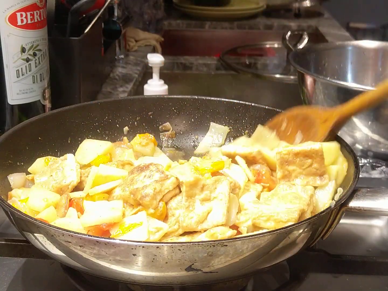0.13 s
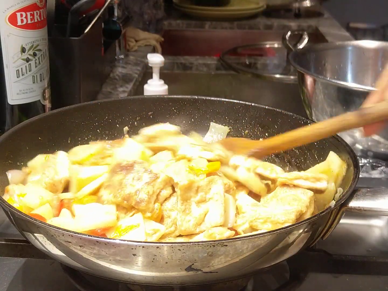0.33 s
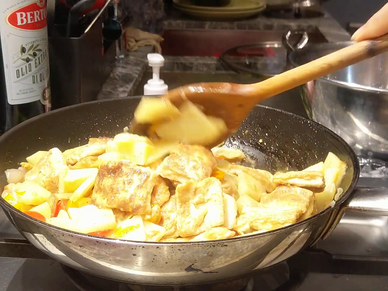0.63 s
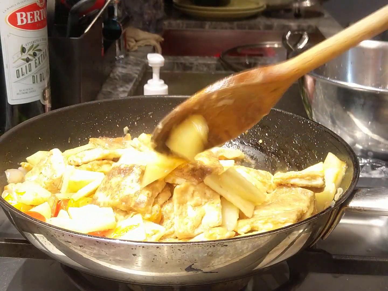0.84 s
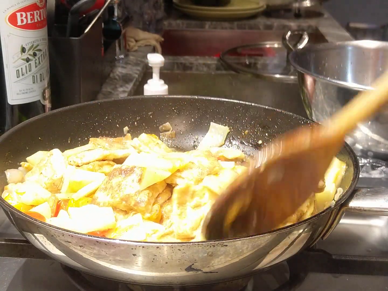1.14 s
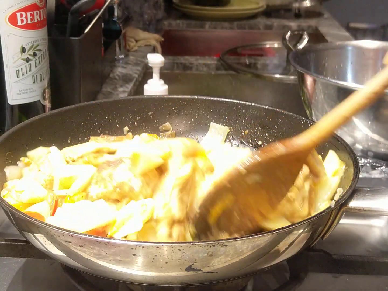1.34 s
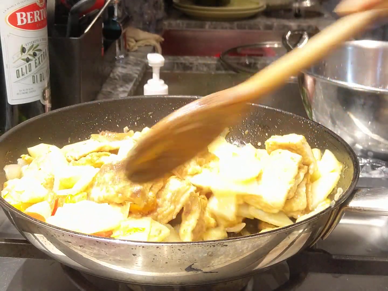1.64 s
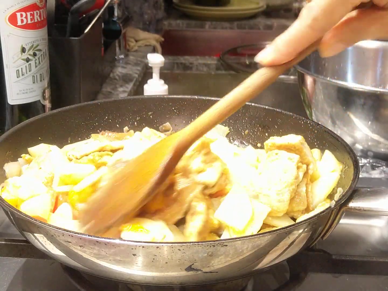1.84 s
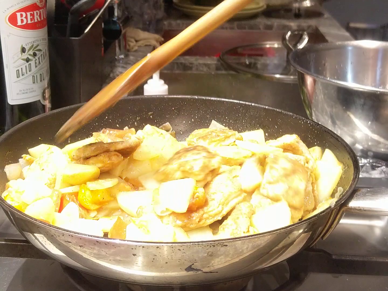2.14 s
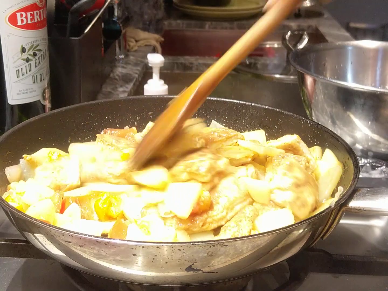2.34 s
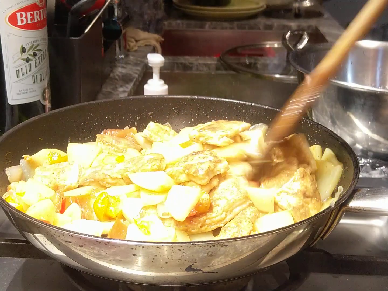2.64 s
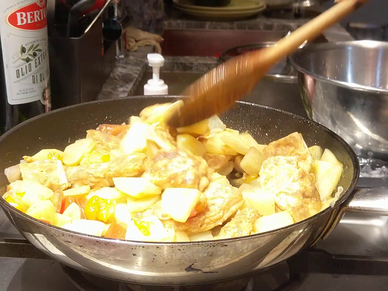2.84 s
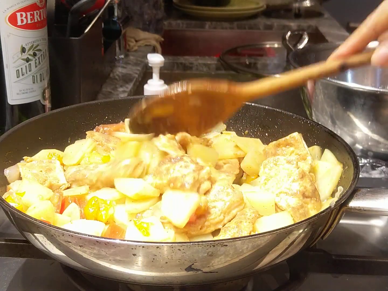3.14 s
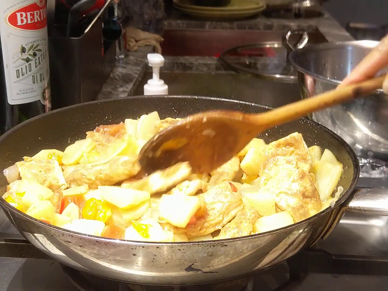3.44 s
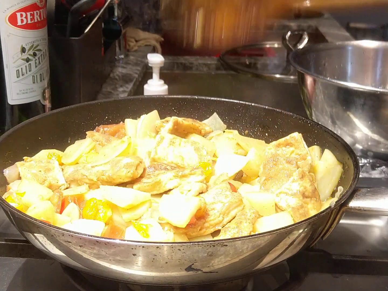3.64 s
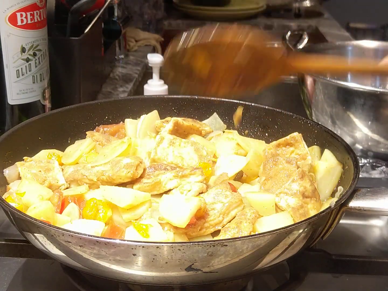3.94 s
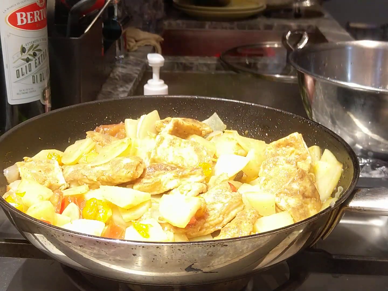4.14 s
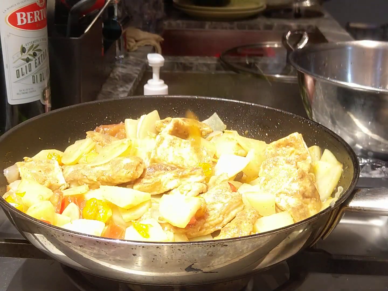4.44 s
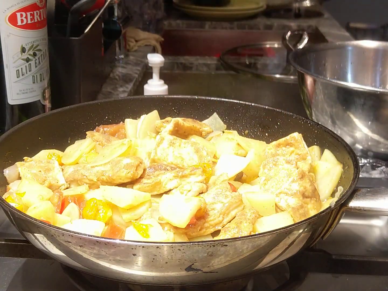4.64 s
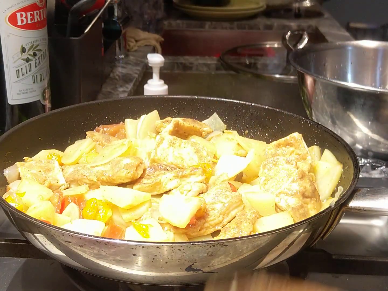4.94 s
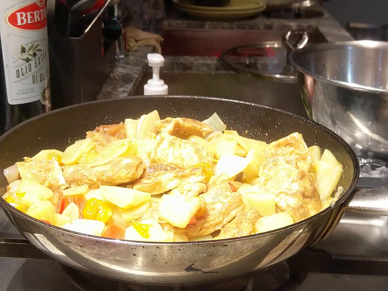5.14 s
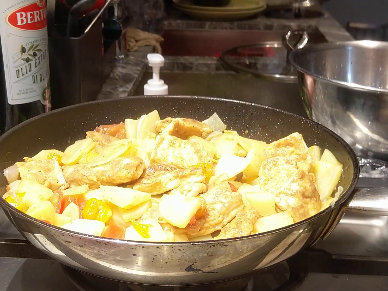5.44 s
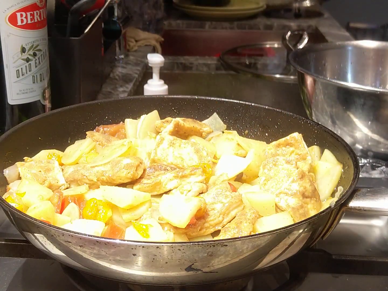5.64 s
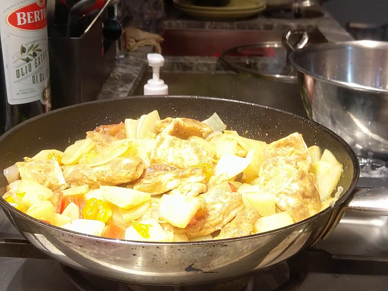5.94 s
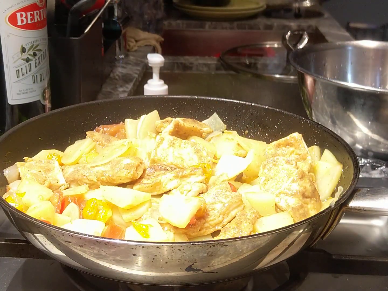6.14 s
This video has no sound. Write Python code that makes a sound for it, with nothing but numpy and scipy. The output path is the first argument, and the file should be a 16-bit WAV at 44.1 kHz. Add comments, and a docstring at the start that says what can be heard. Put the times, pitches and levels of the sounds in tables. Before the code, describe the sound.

Quiet squelches and plops over a gentle fizzing simmer, a loud wooden clack with a bell-like metallic ring, finally two small dry clicks.

```python
"""In a small kitchen, a wooden spoon gently turns meat and vegetables in a simmering steel pan.
Damped low modes give soft bumps, short notes with splashes the sauce plops, high bubble-like tones the smacks.
The spoon is swung aside and laid down: shaped noise and squeaks make it slide, its head knocks on
ringing steel (beating pairs of modes), its handle drops and bounces. Two sharp little clicks follow."""
import sys
import numpy as np
from scipy import signal
from scipy.fft import rfft, irfft
from scipy.io import wavfile
from scipy.ndimage import uniform_filter1d

SR = 44100
rng = np.random.default_rng(int(sys.argv[2]) if len(sys.argv) > 2 else 0)


def inscribe(sig):
    """Save sig as 16-bit PCM at rate SR to the path in sys.argv[1].

    A 1-D sig is mono; a 2-D sig holds one channel per row.
    Samples are clipped to [-1, 1] before scaling.
    """
    pcm = np.round(np.clip(np.atleast_2d(sig).T, -1, 1) * 32767)
    wavfile.write(sys.argv[1], SR, pcm.astype(np.int16))


N = 277389
TIME = np.arange(N) / SR
RING_TIME = TIME[:SR // 2]


def gain_of(db):
    """Level definition: 20 dB is a tenfold amplitude."""
    return 10 ** (np.asarray(db) / 20)


def evened(x):
    """Normalization to an rms amplitude of 1."""
    return x / np.sqrt(np.mean(x ** 2) + 1e-20)


def read(points, hz):
    """Linear interpolation of a table on a logarithmic frequency axis."""
    f, value = np.transpose(points)
    return np.interp(np.log(hz + 1), np.log(f + 1), value)


def add(mix, s, sound):
    """Superposition: mixes a sound in at s seconds."""
    part = mix[max(round(s * SR), 0):][:len(sound)]
    part += sound[:len(part)]


def cut(x, hz, kind, order):
    """Butterworth filtering, low-pass or high-pass."""
    return signal.sosfilt(signal.butter(order, hz, kind, fs=SR, output="sos"), x)


def noise(colour):
    """Spectral shaping: random noise of rms 1 with the given spectrum."""
    spectrum = rfft(rng.standard_normal(N))
    shape = gain_of(read(colour, np.fft.rfftfreq(N, 1 / SR)))
    return evened(irfft(spectrum * shape, N))


def mode(hz, t60):
    """Damped free vibration of one mode, decaying by 60 dB in t60 seconds."""
    return np.sin(2 * np.pi * hz * RING_TIME) * np.exp(-np.log(1000) * RING_TIME / t60)


def runs(events, gap_s, fade_db_per_s, spread, uneven_db=2.5, count=10):
    """Random repetition: each row repeats unevenly, weaker and scattered in pitch, over its length."""
    chances = rng.standard_normal((len(events), count, 3))
    for (s, length, db, hz), chance in zip(events, chances):
        yield s, db, hz
        for k, (late, detune, force) in enumerate(chance, 1):
            if k * gap_s < length:
                level = db - fade_db_per_s * k * gap_s + uneven_db * force
                yield s + gap_s * (k + late / 10), level, hz * np.exp(spread * detune)


# reverberation of the kitchen: (f/Hz, t60/s)
ROOM_DECAY = [(100, 0.4), (300, .45), (1000, 0.32), (3000, 0.31), (7000, 0.29), (12000, 0.25)]


def kitchen(x, wet_db):
    """Reverberation: dense reflections of random sign follow after 4 ms, each band with its own decay."""
    taps = rng.choice([-1., 1.], SR) * (rng.random(SR) < 1 / 8)
    hz, t, bands = signal.stft(taps, SR, nperseg=256)
    fading = np.exp(-np.log(1000) * t / read(ROOM_DECAY, hz)[:, None])
    tail = signal.istft(bands * fading, SR, nperseg=256)[1]
    tail[:round(.004 * SR)] = 0
    return x + gain_of(wet_db) * signal.fftconvolve(x, tail / np.linalg.norm(tail))[:N]


# spectral density of the kitchen air: (f/Hz, relative level/dB per Hz)
AIR_COLOUR = [(15, -38), (25, -15.5), (102, 0), (150, -5.5), (205, 3), (446, -13.5), (609, -10.5),
              (750, -19.5), (998, -15), (1200, -15.5), (1590, -16), (1810, -19), (3850, -20), (5390, -24),
              (12400, -30.5), (16100, -49.5), (22000, -120)]
# low drone in the kitchen: (f/Hz, bandwidth/Hz, level/dB)
DRONE_TONES = [(55.3, 29, -79), (100, 8, -83.5), (115.57, 6, -77.5), (193.8, 6.7, -78), (243.8, 11, -79.5),
               (587.6, 50, -86)]


def background(air_db=-70):
    """Narrow-band noise: a few low, wavering tones over steady broadband air."""
    hz = np.fft.rfftfreq(N, 1 / SR)
    drone = np.zeros(N)
    for f, width, db in DRONE_TONES:
        spectrum = rfft(rng.standard_normal(N)) / (1 + (2 * (hz - f) / width) ** 2)
        drone += gain_of(db) * evened(irfft(spectrum, N))
    return gain_of(air_db) * noise(AIR_COLOUR) + drone


def bursts(per_s):
    """Random impulse excitation: bubbles burst at random instants with random strength."""
    instants = rng.random(N) < per_s / SR
    return instants * gain_of(4 * np.minimum(rng.exponential(1, N), 3))


STIR_FROM_S, STIR_TO_S = .5, 2.9  # the spoon is in the food
# resonances of the filled pan: (f/Hz, relative level/dB)
PAN_MODES = [(610, 1), (877, -2.5), (1000, -1), (1595, -4), (1970, -8.5), (2880, -6.5), (3860, -6),
             (4600, -12)]


def simmer(fizz_db=-91.5, fizz_per_s=2.5, pan_db=-79, stir_db=4, count=30):
    """Resonance under random impulses: bubbles fizz and murmur in the pan; stirring lifts the fizz."""
    fizz, pan = np.zeros((2, N))
    for hz in np.geomspace(2500, 10500, count):  # fizz_per_s holds for each pitch
        fizz += signal.oaconvolve(bursts(fizz_per_s), mode(hz, 110 / hz)[:2048])[:N]
    for hz, db in PAN_MODES:
        pan += gain_of(db) * signal.oaconvolve(bursts(45), mode(hz, .03))[:N]
    stirring = uniform_filter1d(1. * (TIME > STIR_FROM_S) * (TIME < STIR_TO_S), size=SR // 3)
    bubbles = gain_of(fizz_db + stir_db * stirring) * evened(fizz) + gain_of(pan_db) * evened(pan)
    return kitchen(bubbles, wet_db=-4)


BUMP_HZ = 189
# soft bumps of food and spoon on the pan: (t/s, level/dB, time to peak/s)
BUMP_EVENTS = [(0.654, -57.5, .012), (0.733, -56, .012), (1.059, -50, .011), (2.057, -55, .008),
               (2.665, -48, .013), (2.99, -47, .024), (3.112, -51.5, .008), (4.47, -57, .013),
               (5.69, -50.5, .008)]


def bumps():
    """Soft impact: pushes swell and fade in the lowest mode of the pan on its grate."""
    out = np.zeros(N)
    detunes = rng.normal(0, .025, len(BUMP_EVENTS))
    for (s, db, swell), detune in zip(BUMP_EVENTS, detunes):
        u = RING_TIME / swell
        push = (u * np.exp(1 - u)) ** 1.5
        add(out, s, gain_of(db) * push * np.sin(2 * np.pi * BUMP_HZ * (1 + detune) * RING_TIME))
    return kitchen(out, wet_db=-15.5)


PLOP_GAP_S, PLOP_FADE_DB_PER_S, PLOP_SPREAD = .052, 18, .035
# the spoon presses the sauce into runs of plops: (t/s, run length/s, relative level/dB, f/Hz)
PLOP_RUNS = [(0.103, .02, -54, 983), (0.234, .02, -57, 635), (0.494, .02, -50, 997),
             (0.875, .06, -56, 1060), (1.416, .02, -52.5, 1575), (1.439, .02, -52, 1015),
             (1.714, .02, -56, 1024), (2.156, .06, -51, 875), (2.894, .32, -55, 884),
             (3.813, .02, -58, 864), (3.953, .02, -58.5, 1015), (4.154, .06, -52.5, 990)]


def plops(db=-4.5, note_t60=.13, rise_s=.005, splash_db=-9, splash_s=.0051):
    """Damped resonance: pockets of sauce open with a tiny splash and a short, soft note."""
    out = np.zeros(N)
    for s, level, hz in runs(PLOP_RUNS, PLOP_GAP_S, PLOP_FADE_DB_PER_S, PLOP_SPREAD):
        splash = cut(rng.standard_normal(len(RING_TIME)), hz * 1.73, "low", order=3)
        splash = evened(cut(splash, hz / 2, "high", order=2)) * np.exp(-RING_TIME / splash_s)
        note = mode(hz, note_t60) * (1 - np.exp(-RING_TIME / rise_s))
        add(out, s, gain_of(level + db) * (note + gain_of(splash_db) * splash))
    return kitchen(out, wet_db=-3.5)


STRAY_DB, STRAY_HZ = -62, 8400  # relative level, as in the runs of smacks


def strays(count=12):
    """Stratified random timing: faint smacks (t/s, relative level/dB, f/Hz) scattered over the stirring."""
    places = (np.arange(count) + rng.random(count)) / count
    times = STIR_FROM_S + (STIR_TO_S - STIR_FROM_S) * places
    pitches = STRAY_HZ * np.exp(SMACK_SPREAD * rng.standard_normal(count))
    return [(s, STRAY_DB, hz) for s, hz in zip(times, pitches)]


SMACK_GAP_S, SMACK_FADE_DB_PER_S, SMACK_SPREAD = .042, 30, .06
# wet pieces peel apart in runs of smacks: (t/s, run length/s, relative level/dB, f/Hz)
SMACK_RUNS = [(0.6636, .02, -47, 8640), (0.7057, .02, -45, 8420), (0.836, .02, -52.5, 8660),
              (1.0322, .1, -57.5, 8850), (1.4146, .06, -58.5, 9700), (1.6237, .02, -55.5, 7730),
              (2.14, .02, -55, 8780), (2.2197, .06, -53, 8810), (2.5142, .02, -52, 7660),
              (2.5473, .06, -52, 9000), (2.8403, .02, -55, 7520), (2.9312, .02, -56, 6150),
              (4.4535, .02, -52.5, 7973), (6.1977, .02, -58, 8050)]


def smacks(snap_db=-4, snap_t60=.021, bubble_db=-13, bubble_t60=.026, wait_s=.011, count=10):
    """Film rupture and bubble resonance: sauce snaps, and tiny bubbles of similar pitch ring after it."""
    out = np.zeros(N)
    onset = 1 - np.exp(-RING_TIME / .0007)
    events = [*runs(SMACK_RUNS, SMACK_GAP_S, SMACK_FADE_DB_PER_S, SMACK_SPREAD), *strays()]
    for s, level, hz in events:
        add(out, s + .00091, gain_of(level + snap_db) * mode(hz, snap_t60) * onset)
        waits = rng.exponential(wait_s, count)
        detunes = rng.normal(-.038, .23, count)
        sizes = rng.random(count)
        for wait, detune, size in zip(waits, detunes, sizes):
            bubble = mode(hz * np.exp(detune), bubble_t60) * onset
            add(out, s + wait, gain_of(level + bubble_db) * size * bubble)
    return kitchen(out, wet_db=0)


PING_GAP_S, PING_FADE_DB_PER_S, PING_SPREAD = .035, 25, .02
# light touches and grazes of the pan: (t/s, run length/s, relative level/dB, f/Hz)
PING_RUNS = [(0.672, .04, -62, 4700), (1.404, .02, -60, 4640), (2.1871, .08, -59.5, 5200),
             (3.755, .02, -62, 3800), (4.3355, .12, -59, 3860), (4.563, .02, -58, 2834),
             (5.084, .02, -57.5, 3907), (5.7259, .02, -62.5, 2850)]


def pings(db=-4, rise_s=.0027, pan_db=-3):
    """Frequency-dependent damping: a high pan mode dies sooner the higher it is, over other resonances."""
    out = np.zeros(N)
    pan = sum(gain_of(pan_db + mode_db) * mode(hz, .06) for hz, mode_db in PAN_MODES if hz > 1500)
    onset = 1 - np.exp(-RING_TIME / rise_s)
    for s, level, hz in runs(PING_RUNS, PING_GAP_S, PING_FADE_DB_PER_S, PING_SPREAD):
        ping = mode(hz, .11 * (3500 / hz) ** 2)
        add(out, s, gain_of(level + db) * (ping + pan) * onset)
    return kitchen(out, wet_db=-1.5)


# sharp clicks: (t/s, relative level/dB, lowest f/Hz)
CLICK_EVENTS = [(5.8828, -25, 8400), (5.9568, -27.5, 2558)]
# spectrum of a click: (f/Hz, relative level/dB)
CLICK_SPECTRUM = [(2000, -2.5), (2950, 5.5), (3900, -4), (5000, -7), (6500, -11), (9000, -15),
                  (10400, -27.5), (11500, -17), (13000, -31)]


def clicks(db=9, chatter_db=-20, chatter_s=.00281, ring_hz=2930, ring_db=-42, ring_t60=.14):
    """Minimum-phase impulse: hard snaps with brief chatter and a faint ring, largely through the room."""
    log_gain = np.log(gain_of(read(CLICK_SPECTRUM, abs(np.fft.fftfreq(1024, 1 / SR)))))
    snap = np.fft.ifft(np.exp(np.conj(signal.hilbert(log_gain)))).real
    snap /= abs(snap).max()
    ring = gain_of(ring_db) * mode(ring_hz, ring_t60)
    out = np.zeros(N)
    for s, level, low_hz in CLICK_EVENTS:
        chatter = rng.standard_normal(len(RING_TIME)) * np.exp(-RING_TIME / chatter_s)
        contact = gain_of(chatter_db) * chatter
        contact[0] = 1
        click = signal.fftconvolve(contact, snap)[:len(contact)] + ring
        add(out, s, gain_of(level + db) * cut(click, low_hz, "high", order=9))
    return kitchen(out, wet_db=-1.5)


# the spoon slides through the hand: the swish swells, then dies away
SLIDE_FROM_S, SLIDE_ATTACK_S, SLIDE_DB, SLIDE_FADE_DB_PER_S = 4.565, .1, -49.5, 120
# spectrum of skin sliding on wood: (f/Hz, relative level/dB)
SLIDE_SPECTRUM = [(1500, -33.5), (4500, -20), (5500, -9), (7500, -3), (9000, -8), (10500, -18),
                  (12500, -25)]


def slide(squeak_share=.9, count=24):
    """Friction: skin slips on wood; tiny squeaks come first, then a soft swish swells over them."""
    squeaks = np.zeros(N)
    for hz in np.geomspace(3300, 11500, count):
        slips = rng.standard_normal(N) * (rng.random(N) < 14 / SR)
        squeak = signal.oaconvolve(slips, mode(hz, .035)[:2048])[:N]
        squeaks += gain_of(read(SLIDE_SPECTRUM, hz)) * squeak
    age = TIME - SLIDE_FROM_S
    speed = np.clip(age / SLIDE_ATTACK_S, 0, 1)
    fade = gain_of(SLIDE_DB - SLIDE_FADE_DB_PER_S * np.maximum(age - SLIDE_ATTACK_S, 0))
    return fade * (speed ** 2 * noise(SLIDE_SPECTRUM) + speed * squeak_share * evened(squeaks))


# spectrum of the shaken worktop: (f/Hz, relative level/dB)
THUD_SPECTRUM = [(25, -18.5), (40, -10.5), (54, 1), (80, -2), (118, 3.5), (160, -13), (250, -5), (350, -14),
                 (500, -25), (1000, -60)]


def thud(db=-46, swell_s=.010145, t60=.5714):
    """Structure-borne sound: the first blow shakes the worktop."""
    age = np.maximum(TIME - BLOWS[0][0], 0)
    envelope = (1 - np.exp(-age / swell_s)) * np.exp(-np.log(1000) * age / t60)
    return gain_of(db) * noise(THUD_SPECTRUM) * envelope


BELL_HZ, BELL_BEAT_HZ = 1107.3, 7  # the steel's main pair
# close pairs of steel modes that beat:
# (f/Hz, split/Hz, relative level under the head/dB, under the handle/dB, t60 under the head/s)
STEEL_MODES = [(BELL_HZ, BELL_BEAT_HZ, -14.5, -12, 0.3368), (387.5, -1, -60, -63.5, 0.7),
               (844.5, 9, -44.5, -21, 0.3069), (1309, 3.5, -29.5, -31.5, 0.1062),
               (1551, 13.5, -45.5, -29.5, 0.2), (1976, 12, -41, -17, .17), (2647, 8, -38, -18, .22),
               (3709.5, 60, -53, -41.5, 0.29), (4313.5, 9, -48.5, -48.5, 0.2226),
               (4753, 22, -38, -27, 0.2087), (4800, 75, -50, -32, .2), (4978, 7.5, -50, -35.5, 0.1575),
               (5812, 40.5, -60.5, -42, 0.0031), (7345, 4, -37.5, -30.5, .16), (7424, 55, -60, -42, .2)]


def steel_ring(handle, rise_s=.0076, buzz_db=-27, buzz_s=.0106, damped=.499):
    """Modal excitation: the place of contact decides which modes ring; high modes build up sooner."""
    ring = np.zeros(len(RING_TIME))
    for hz, split, head_db, handle_db, t60 in STEEL_MODES:
        if handle:
            t60 = t60 * damped
        pair = mode(hz - split / 2, t60) + mode(hz + split / 2, t60)
        build_up = 1 - np.exp(-RING_TIME * hz / (rise_s * BELL_HZ))  # rise_s holds at BELL_HZ
        ring += gain_of(handle_db if handle else head_db) * pair * build_up
    if handle:  # the loose handle buzzes against the rim
        buzz = gain_of(buzz_db) * rng.standard_normal(len(RING_TIME)) * np.exp(-RING_TIME / buzz_s)
        ring = ring + signal.fftconvolve(ring, buzz)[:len(ring)]
    return ring


HEAD_BAND, HANDLE_BAND = (197, 10000), (470, 2700)  # what a blow excites in crack and wood: from, up to Hz
# blows of the spoon, levels relative:
# (t/s, wood level/dB, crack level/dB, ring level/dB, contact place 0 head - 1 handle)
BLOWS = [(4.6687, -17.5, -18.5, -0.5, 0), (4.8302, -14.5, -31, -28.5, 1), (4.8392, -30.5, -30.5, -28.5, 1),
         (4.862, -39, -39.5, -36, 1), (4.893, -45, -52.5, -42.5, 1)]
# modes of the wooden spoon: (f/Hz, relative level/dB, t60/s)
WOOD_MODES = [(470, -18, 0.036), (625, -22, 0.081), (785.2, -11.5, .05), (897.1, -14, 0.0606),
              (1000.4, -7.5, .05), (1165.7, -4, .055), (1668, -24, 0.14), (1870, -21, .05),
              (2013.1, -11, .06), (2300, -33.5, .04), (2680, -24, 0.013)]
# spectrum of the crack: (f/Hz, relative level/dB)
CRACK_SPECTRUM = [(200, -16), (500, -9), (850, 1.5), (1400, -0.5), (2200, -2.5), (2900, -14), (3800, -5.5),
                  (6500, -15), (8200, -19), (12000, -32.5)]


def knocks(crack_s=.0035):
    """Impact excitation: each blow gives a crack, a short wooden clack and a ring of the steel."""
    cracks, wood, steel = np.zeros((3, N))
    clack = sum((-1) ** k * gain_of(db) * mode(hz, t60) for k, (hz, db, t60) in enumerate(WOOD_MODES))
    for s, wood_db, crack_db, ring_db, place in BLOWS:
        handle = place > .5
        low_hz, high_hz = HANDLE_BAND if handle else HEAD_BAND
        crack = noise(CRACK_SPECTRUM)[:len(RING_TIME)] * np.exp(-RING_TIME / crack_s)
        crack = cut(cut(crack, high_hz, "low", order=9), low_hz, "high", order=6)
        add(cracks, s, gain_of(crack_db) * crack)
        knock = cut(cut(clack, high_hz, "low", order=6), low_hz, "high", order=5)
        add(wood, s, gain_of(wood_db) * knock)
        add(steel, s, gain_of(ring_db) * steel_ring(handle))
    near_steel = kitchen(steel, wet_db=-26)
    bright = cut(steel, 1900, "high", order=7)  # the high modes radiate far more into the room
    shimmer = kitchen(bright, wet_db=-12) - bright  # only their reverberation
    return kitchen(cracks, wet_db=-4) + kitchen(wood, wet_db=-14.5) + near_steel + shimmer


def scene():
    """Superposition of all sources at one microphone."""
    blows = knocks() + thud()
    food = bumps() + plops() + pings() + smacks() + simmer()
    return (blows + food + clicks() + slide() + background())[None]


def record(dry):
    """Band limitation: the recorder drops the deepest bass and the top of the treble."""
    lean = cut(dry, 36, "high", order=4)
    treble_limit = signal.firwin(401, 12650, window=("kaiser", 8), fs=SR)
    return signal.oaconvolve(lean, treble_limit[None], "same")


dry = scene()
out = record(dry)
inscribe(out)
```